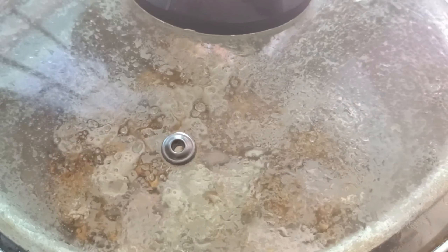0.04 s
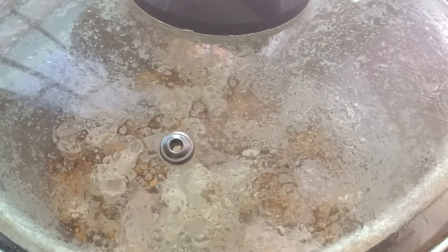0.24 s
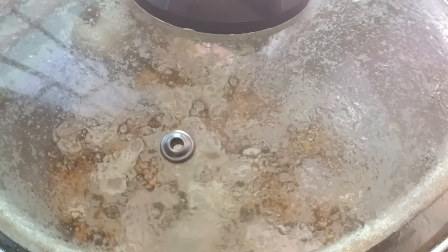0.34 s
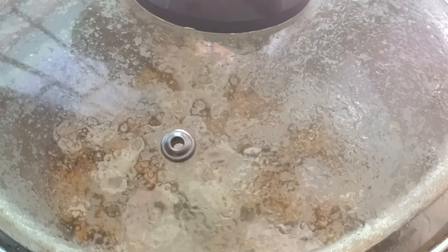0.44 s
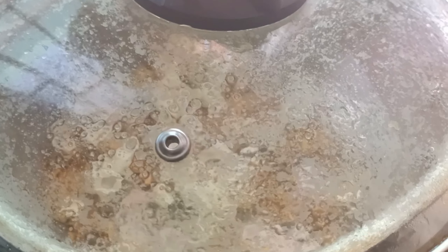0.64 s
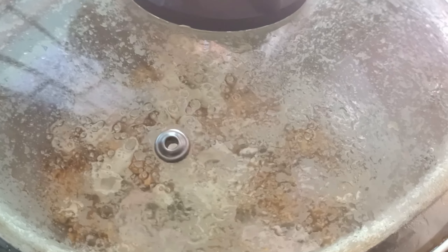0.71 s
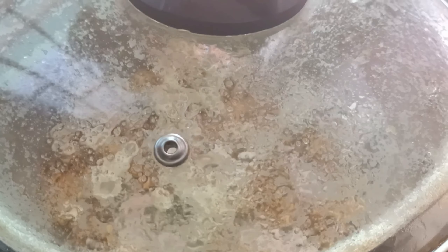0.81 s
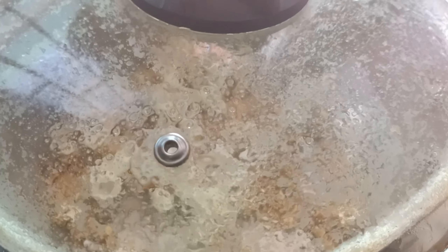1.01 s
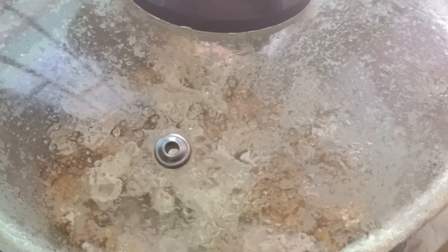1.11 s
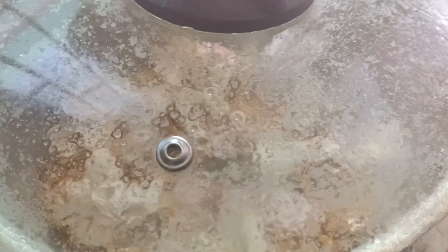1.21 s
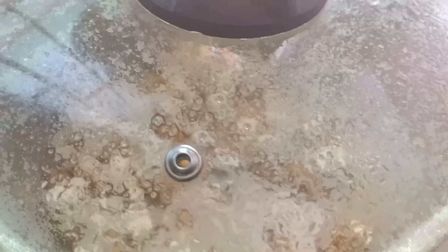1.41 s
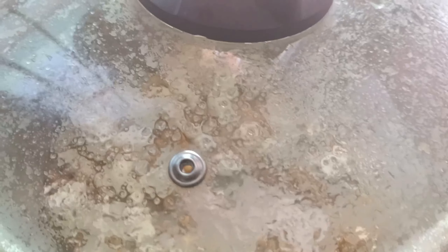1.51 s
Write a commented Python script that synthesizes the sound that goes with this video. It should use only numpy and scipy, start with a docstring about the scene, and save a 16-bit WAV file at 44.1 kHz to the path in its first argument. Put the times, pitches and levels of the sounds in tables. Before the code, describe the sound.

Popcorn pops sharply in a lidded pot over a faint sizzle of oil.

```python
"""Popcorn in a lidded pot

Corn pops in hot oil in a small kitchen, the stereo microphone just above the pot's glass lid.
Each hull cracks and rings pot and lid, and the swelling starch thumps the air inside.
Flung kernels tick against the wall, and one clinks on the lid's steel rim.
Underneath, the oil sizzles faintly over the low rumble of the stove."""
import sys
import numpy as np
from scipy import signal
from scipy.fft import rfft, irfft, next_fast_len
from scipy.io import wavfile
from scipy.ndimage import uniform_filter1d

SR = 44100
rng = np.random.default_rng(int(sys.argv[2]) if len(sys.argv) > 2 else 0)


def to_wav(s):
    """Save 16-bit WAV."""
    ch = np.atleast_2d(s).T  # columns
    pcm = np.round(np.clip(ch, -1, 1) * 32767)  # PCM
    wavfile.write(sys.argv[1], SR, pcm.astype(np.int16))


N = 68355
T = np.arange(int(.8 * SR)) / SR  # seconds into one event


def amp(db):
    """Decibels to gain."""
    return 10 ** (np.asarray(db) / 20)


def unit(x):
    """Scale to rms 1."""
    return x / np.sqrt(np.mean(x ** 2) + 1e-20)


def along(points, hz):
    """Read (freq_hz, value) points on a log axis."""
    freqs, values = np.transpose(points)
    return np.interp(np.log(hz + 1), np.log(freqs + 1), values)


def rise(attack_s):
    """An event's onset, climbing from 0 towards 1."""
    return 1 - np.exp(-T / attack_s)


def fade(t, t60_s):
    """Full level until t = 0, then 60 dB down every t60_s."""
    return np.exp(-np.log(1000) * np.maximum(t, 0) / t60_s)


def coloured(x, db_of_hz):
    """Filter x by a gain in dB that depends on frequency."""
    n = x.shape[-1]
    padded = next_fast_len(n + 8192)
    gain = amp(db_of_hz(np.fft.rfftfreq(padded, 1 / SR)))
    return irfft(rfft(x, padded) * gain, padded)[..., :n]


def noise(db_of_hz, size):
    """Coloured noise of rms 1, unrelated left and right."""
    return unit(coloured(rng.standard_normal((2, size)), db_of_hz))


def narrowed(pair, side):
    """Set the stereo width of an unrelated pair: side 0 is mono, 1 is fully wide."""
    return np.array([pair[0] + side * pair[1], pair[0] - side * pair[1]]) / np.hypot(1, side)


def hump(hz, centre_hz, octaves, skirt_db):
    """A broad resonance: 0 dB at the centre, falling towards skirt_db."""
    distance = np.log2((hz + 1) / centre_hz) / (2 * octaves)
    return skirt_db * (1 - 1 / (1 + distance ** 2))


def add(out, start_s, sound):
    """Mix a sound in at start_s."""
    i = round(start_s * SR)
    part = sound[:, max(-i, 0):N - i]
    out[:, max(i, 0):max(i, 0) + part.shape[1]] += part


def tail(colour, decay):
    """Reverberation in which each frequency dies at its own speed."""
    hz, t, spectrum = signal.stft(noise(colour, len(T)), SR, nperseg=256)
    spectrum = spectrum * fade(t, along(decay, hz)[:, None])
    return signal.istft(spectrum, SR, nperseg=256)[1][:, :len(T)]


def ring(modes, spread, attack_s, weight_db=lambda hz: 0):
    """Decaying modes; each blow weights them anew, and they reach left and right out of step."""
    hz, db, t60_s = np.transpose(modes)[:, :, None]
    level, apart, start = rng.standard_normal((3, len(hz), 1))
    phase = 2 * np.pi * (hz * T + start)
    envelope = amp(db + weight_db(hz) + 2 * level) * fade(T, t60_s)
    lag = spread * np.tanh(2 * apart)
    pair = np.array([(envelope * np.sin(phase + side * lag)).sum(0) for side in (1, -1)])
    return pair * rise(attack_s)


# reverberation under the lid and out in the kitchen: freq_hz, t60_s
POT_REVERB = [(300, 0.098), (2500, 0.37), (7000, 0.17), (15000, 0.25)]
KITCHEN_REVERB = [(300, 1), (2500, 0.47), (7000, 0.41), (15000, 0.18)]

def burst(colour, attack_s, hold_s, t60_s, pot_db, room_db):
    """A ragged snap, its rattle of echoes under the lid, and the kitchen's answer."""
    flutter_db = 3 * unit(uniform_filter1d(rng.standard_normal((2, len(T))), size=14))
    snap = noise(colour, len(T)) * unit(amp(flutter_db)) * fade(T - hold_s, t60_s)
    echoes = amp(pot_db) * tail(colour, POT_REVERB) + amp(room_db) * tail(colour, KITCHEN_REVERB)
    return narrowed(snap + echoes, side=1.0) * rise(attack_s)


# modes of the steel pot, in matching lists: pitch_hz and level_db
STEEL_HZ = [1313, 1936, 2060, 2385, 2544, 2749, 2968, 3197, 4313, 4458, 5055, 5139, 5376, 5429, 5793, 6485,
            6792, 7811, 8615, 1050]
STEEL_DB = [-3, -0.5, -8, -1.5, -8.5, -10.5, -14, -4.5, -29, -12, -19, -24, -5.5, -5, -13, -16, -23, -17,
            -13, -16]

def pot_modes():
    """The pot's modes as pitch_hz, level_db, t60_s; higher ones die sooner."""
    return [(hz, db, 0.19 * (hz / STEEL_HZ[0]) ** -0.37) for hz, db in zip(STEEL_HZ, STEEL_DB)]


# spectrum of a crack, also behind the ticks and the clink: freq_hz, level_db
CRACK_SPECTRUM = [(60, -53), (300, -8.5), (700, -7), (1600, -9), (2200, 2.5), (3200, 1), (3900, -2.5),
                  (5500, 3), (7000, -0.5), (8600, 1), (9800, -4.5), (11000, -1.5), (14200, -8.5),
                  (15500, -15)]
# modes of the glass lid: pitch_hz, level_db, t60_s
LID_MODES = [(1944, -3, .13), (2440, -8, .13), (3221, -11, .2), (3588, 0, .12), (3786, -10, .15),
             (6040, -9, .12), (6783, -12, .13)]
# hulls cracking: start_s, crack_db, tilt_db_per_octave, clack_db, pot_db, lid_db, left_over_right_db
HULL_POPS = [(-.035, -27.5, 3, -0.5, -31.5, -28.5, 0.5), (0.2426, -20, -1.5, 4.5, -22.5, -33.5, -1),
             (0.4189, -21, 1, 0, -34.5, -39, 0.5), (.4742, -13.5, 0.57, -0.5, -18.5, -25, 0),
             (.8920, -24.5, 2.9, 1.5, -36.5, -39, 0.5), (1.231, -27, 0.5, 3, -40.5, -27.5, 1)]

def pops():
    """Hulls crack close under the microphone and ring pot and lid; returns cracks and ringing."""
    cracks, ringing = np.zeros((2, 2, N))
    clack_hz, clack_octaves, pivot_hz = 2030, 0.31, 4500
    for start_s, crack_db, tilt, clack_db, pot_db, lid_db, pan_db in HULL_POPS:
        def colour(hz):
            """The crack's spectrum with its hollow clack and treble tilt."""
            clack = clack_db * np.exp(-.5 * (np.log2((hz + 1) / clack_hz) / clack_octaves) ** 2)
            treble = tilt * np.log2(np.maximum(hz, pivot_hz / 4) / pivot_hz)
            return along(CRACK_SPECTRUM, hz) + clack + treble

        crack = burst(colour, attack_s=0.00065, hold_s=.004, t60_s=0.019, pot_db=-2.5, room_db=-10.5)
        pot = amp(pot_db) * ring(pot_modes(), spread=1.0, attack_s=0.00043)
        pot *= amp([[1.0], [-1.0]])  # a little to the left
        lid = amp(lid_db) * ring(LID_MODES, spread=0.84, attack_s=0.0011)
        pan = amp([[pan_db / 2], [-pan_db / 2]])
        add(cracks, start_s, amp(crack_db) * crack * pan)
        add(ringing, start_s, (pot + lid) * pan)
    return cracks, ringing


# low resonances of the pot's air and the kitchen: pitch_hz, level_db, t60_s
AIR_MODES = [(88, -37, .2), (125, -16.5, 0.43), (172.3, -18.5, 0.27), (207, -30, 0.26),
             (244.5, -25.5, 0.49), (282, -14, 0.05), (305.7, -15, 0.23), (335, -24.5, 0.15),
             (457, -23, 0.22), (560.5, -25.5, 0.13)]
# spectrum of the noisy wash in each boom: freq_hz, level_db
BOOM_SPECTRUM = [(20, -33), (60, -7.5), (120, -3), (300, 1), (420, -20.5), (800, -17.5), (2000, -33)]
# starch bursting outward: peak_s, push_db, pitch_hz, boom_db
STARCH_THUMPS = [(-.015, -22, 260, -26), (0.2472, -24, 129.4, -19.5), (0.4216, -31, 204, -27.5),
                 (.4820, -20, 247, -19.5), (0.4962, -15, 262, -16.5), (0.8962, -25.5, 228, -26.5),
                 (1.2329, -15, 244, -16.5), (1.536, -45, 258, -34.5)]

def thumps():
    """The starch swells in one short push of air, which booms on in pot and kitchen."""
    out = np.zeros((2, N))
    t = np.arange(N) / SR
    push_cycles = 0.47
    for peak_s, push_db, pitch_hz, boom_db in STARCH_THUMPS:
        cycles = (t - peak_s) * pitch_hz
        out -= amp(push_db) * np.cos(2 * np.pi * cycles) * np.exp(-.5 * (cycles / push_cycles) ** 2)
        wash = narrowed(noise(lambda hz: along(BOOM_SPECTRUM, hz), len(T)), side=0.31)
        wash *= fade(T, t60_s=0.41) * rise(0.0013)
        boom = ring(AIR_MODES, spread=.13, attack_s=0.0011) + amp(-16) * wash
        add(out, peak_s, amp(boom_db) * boom)
    return out


# spectrum of the sizzling oil: freq_hz, level_db
SIZZLE_SPECTRUM = [(150, -15), (500, -2.5), (900, -2.5), (1600, -7.5), (2300, 3.5), (3200, 1.5),
                   (4100, -1.5), (5500, 1), (8700, 0.5), (10500, -0.5), (14500, -1.5), (16000, -12)]
# spurts of steam in the oil: peak_s, width_s, level_db, centre_hz
STEAM_SPURTS = [(0.754, 0.35, -45.5, 6000), (1.17, 0.034, -41.5, 6950), (1.322, 0.01, -43, 4500),
                (1.429, 0.019, -38.5, 4360)]

def oil():
    """A fine hiss of bubbles with tiny spits, growing slowly and swelling where steam spurts out."""
    t = np.arange(N) / SR
    spits_per_s, rise_db_per_s = 1600, 1.95
    colour = lambda hz: along(SIZZLE_SPECTRUM, hz)
    spits = (rng.random(N) < spits_per_s / SR) * rng.random(N)
    spit_level = signal.fftconvolve(spits, fade(T, t60_s=0.035))[:N]
    out = amp(-48.5) * noise(colour, N) + amp(-54) * unit(spit_level * noise(colour, N))
    out *= amp(rise_db_per_s * (t - t.mean()))
    for peak_s, width_s, level_db, centre_hz in STEAM_SPURTS:
        steam = noise(lambda hz: colour(hz) + hump(hz, centre_hz, octaves=2.5, skirt_db=-29), N)
        out += amp(level_db) * np.exp(-.5 * ((t - peak_s) / width_s) ** 2) * steam
    return narrowed(out, side=0.95)


def wall_echoes(x):
    """Close echoes between wall and lid comb the treble, differently left and right."""
    echo_share = .45  # of the power
    highpass = signal.butter(2, 2320, 'high', fs=SR, output='sos')
    response = signal.sosfilt(highpass, rng.standard_normal((2, len(T))))
    response *= fade(T, t60_s=.028) * rise(0.0006)
    response /= np.linalg.norm(response, axis=1, keepdims=True)
    echoes = signal.fftconvolve(x, response, axes=1)[:, :N]
    return np.sqrt(1 - echo_share) * x + np.sqrt(echo_share) * echoes


# spectrum of the stove's rumble: freq_hz, level_db
RUMBLE_SPECTRUM = [(20, -10), (45, -21), (75, -4), (100, -0.5), (122, 0), (143, -3.5), (166, 4.5),
                   (195, -18.5), (300, -11.5), (450, -17), (900, -26), (3000, -49)]

def stove():
    """A steady low rumble from beneath the pot, almost mono at the microphone."""
    return amp(-51.5) * narrowed(noise(lambda hz: along(RUMBLE_SPECTRUM, hz), N), side=0.071)


# spectrum of a kernel's dull knock: freq_hz, level_db
KNOCK_SPECTRUM = [(40, -5), (120, -8), (300, -3), (500, -0.5), (850, 3), (1200, -1), (2200, -14),
                  (6000, -45)]
# flung kernels striking the pot: start_s, snap_db, centre_hz, width_octaves, ring_db, knock_db
KERNEL_TICKS = [(0.275, -26, 2930, 0.86, -28.5, -39), (0.285, -24.5, 4500, 0.32, -34, -44),
                (0.3018, -21, 2970, 0.33, -24, -37), (.3560, -28, 3020, 0.36, -32.5, -41),
                (0.686, -36.5, 1320, 2.2, -45, -41.5), (0.925, -51, 4170, 0.76, -35, -49),
                (1.4840, -43.5, 2000, 2.2, -44, -54.5)]

def ticks():
    """Light kernels hit the wall: a snap, the pot's modes near its pitch, and a dull knock."""
    out = np.zeros((2, N))
    for start_s, snap_db, centre_hz, octaves, ring_db, knock_db in KERNEL_TICKS:
        contact = lambda hz: hump(hz, centre_hz, octaves, skirt_db=-24)
        colour = lambda hz: along(CRACK_SPECTRUM, hz) + contact(hz)
        snap = burst(colour, attack_s=0.00044, hold_s=0.0049, t60_s=0.041, pot_db=-9.5, room_db=-21)
        tink = ring(pot_modes(), spread=0.9, attack_s=0.00055, weight_db=contact) * fade(T, t60_s=1.0)
        knock = narrowed(noise(lambda hz: along(KNOCK_SPECTRUM, hz), len(T)), side=0.5)
        knock *= fade(T, t60_s=0.21) * rise(0.0031)
        add(out, start_s, amp(snap_db) * snap + amp(ring_db) * tink + amp(knock_db) * knock)
    return out


# modes of the lid's steel rim: pitch_hz, level_db, t60_s
RIM_MODES = [(2200, -8, .1), (3204, -6, .2), (4456, -2, .19), (5139, -3, .2), (5440, -5, .17),
             (5900, -5, .19), (6288, -4, .14), (6792, -5, .13), (8615, -5, .13)]
# a kernel striking the rim: start_s, snap_db, ring_db
RIM_CLINKS = [(0.5922, -22, -27)]

def clinks():
    """A hard kernel snaps brightly on the rim, which sings on briefly."""
    out = np.zeros((2, N))
    colour = lambda hz: along(CRACK_SPECTRUM, hz) + hump(hz, centre_hz=4950, octaves=0.84, skirt_db=-14)
    for start_s, snap_db, ring_db in RIM_CLINKS:
        snap = burst(colour, attack_s=0.0011, hold_s=0.0058, t60_s=0.036, pot_db=-4.5, room_db=-12.5)
        rim = ring(RIM_MODES, spread=.7, attack_s=0.00079)
        add(out, start_s, amp(snap_db) * snap + amp(ring_db) * rim)
    return out


def scene():
    """The pot on the stove, from just above the lid."""
    cracks, ringing = pops()
    return wall_echoes(cracks + oil()) + ringing + thumps() + ticks() + clinks() + stove()


def record(dry):
    """The microphone's signal, cut off steeply in the top treble."""
    top_hz = 15350
    return coloured(dry, lambda hz: -np.clip((hz - top_hz) / 10, 0, 120))


dry = scene()
out = record(dry)
to_wav(out)
```